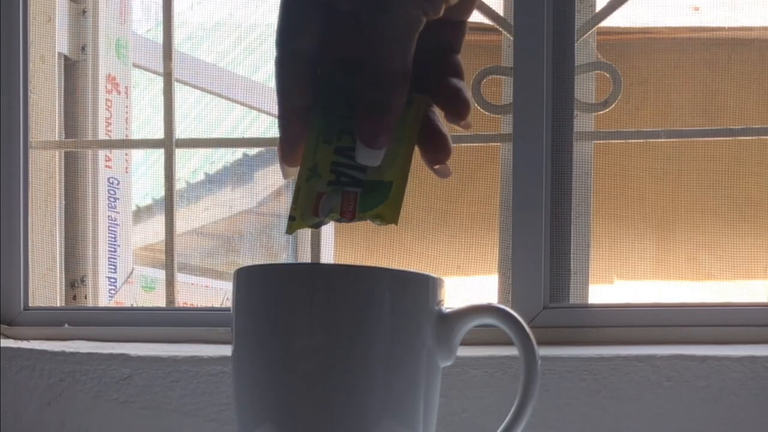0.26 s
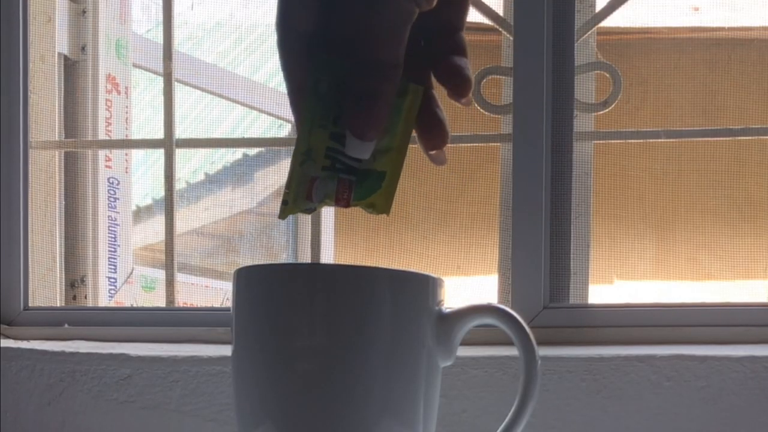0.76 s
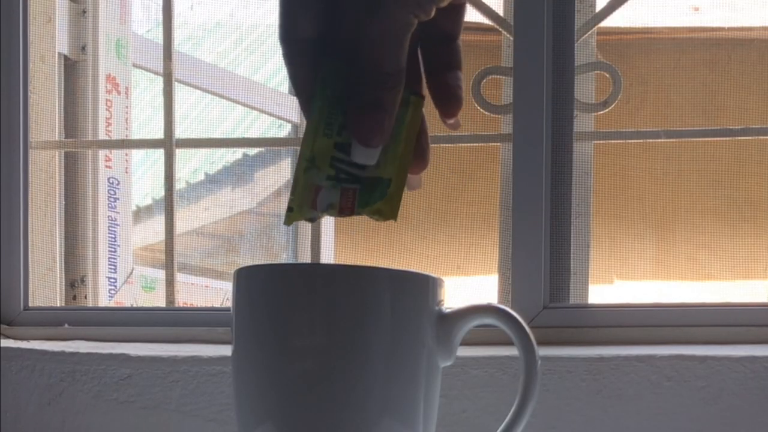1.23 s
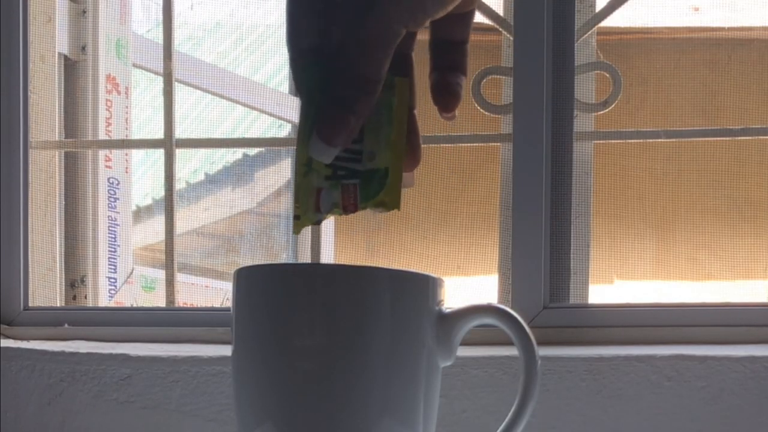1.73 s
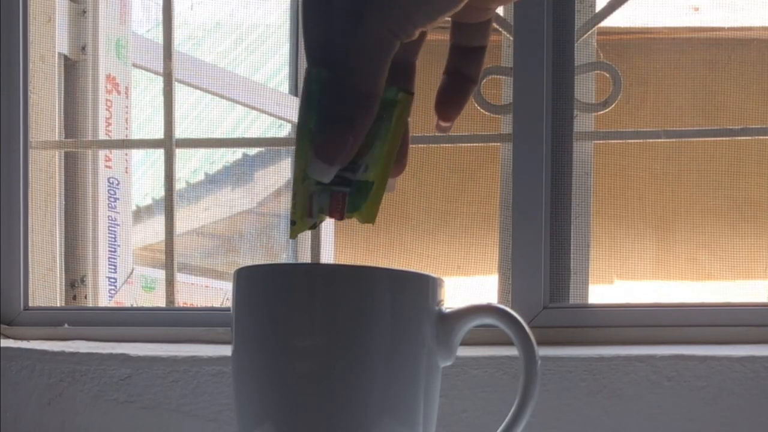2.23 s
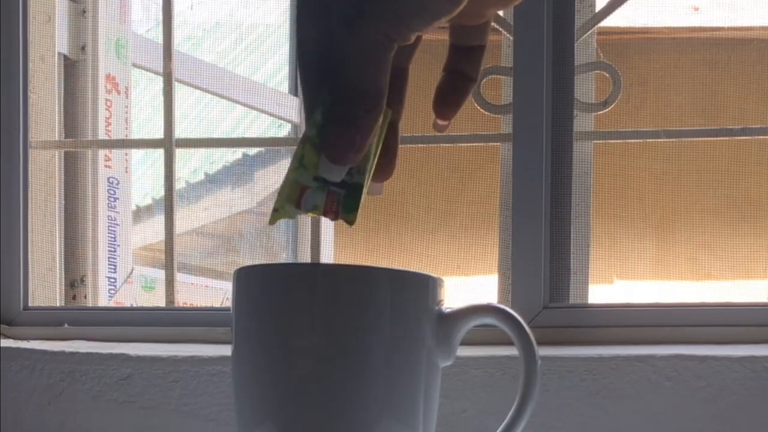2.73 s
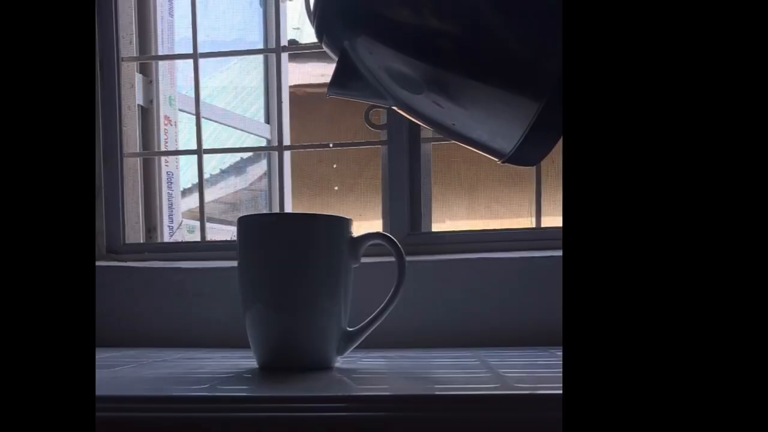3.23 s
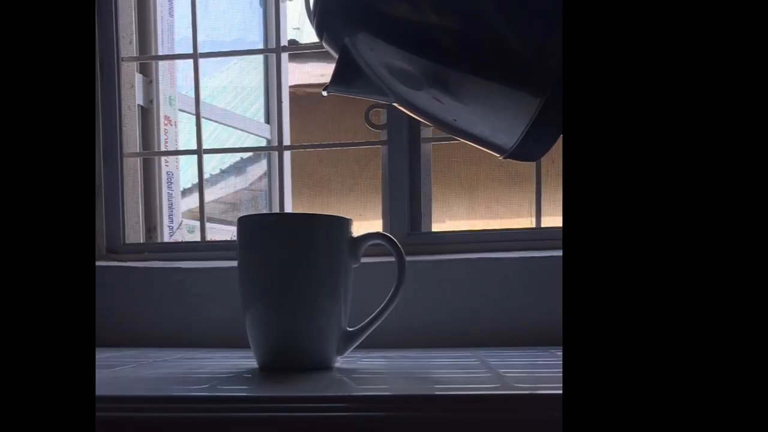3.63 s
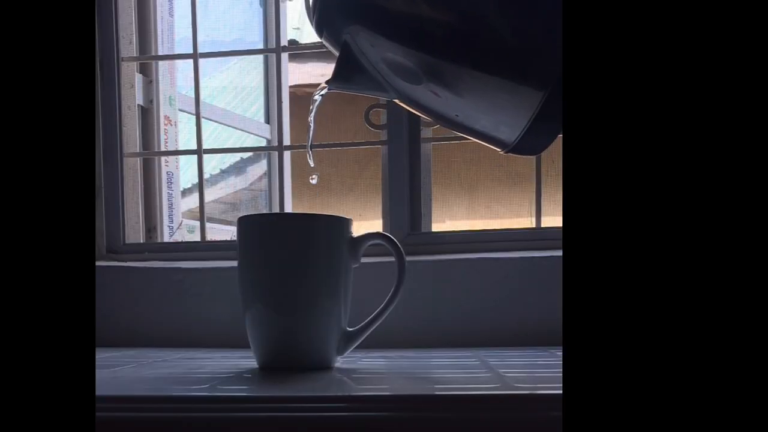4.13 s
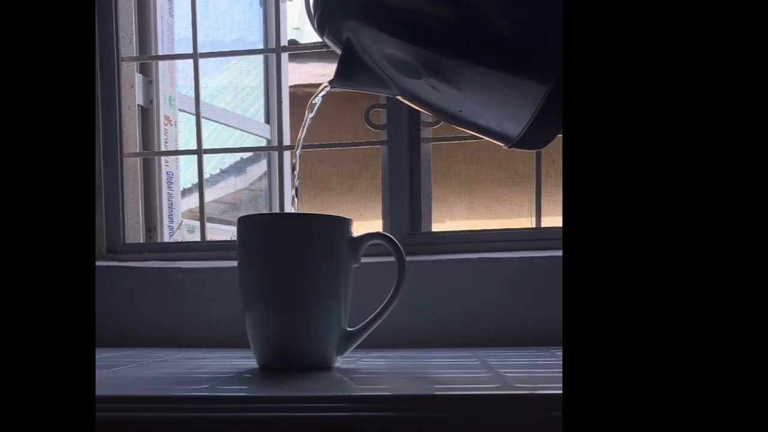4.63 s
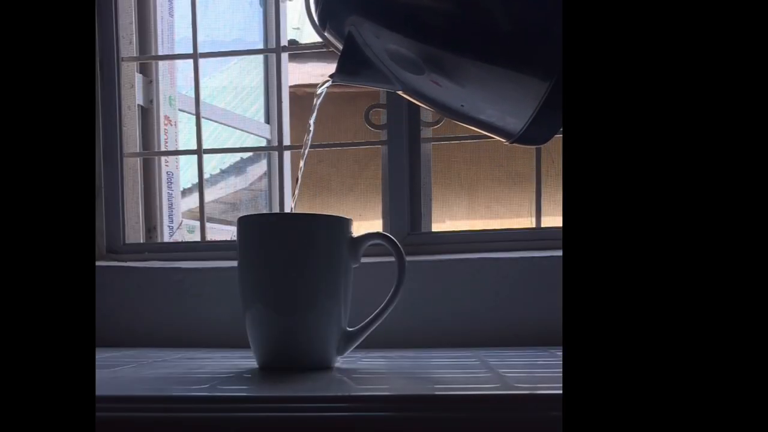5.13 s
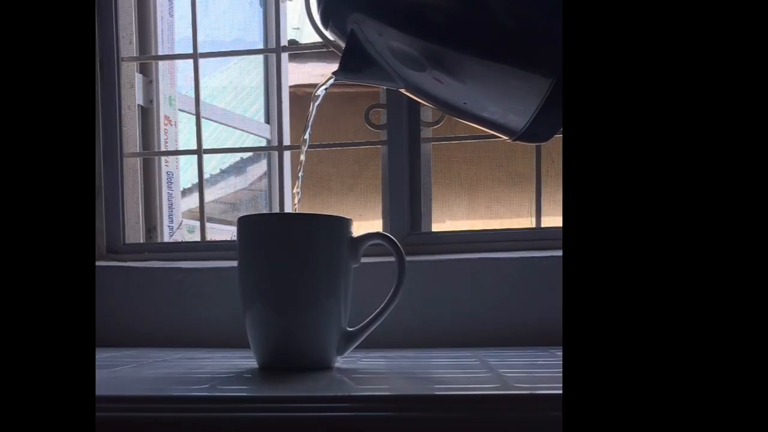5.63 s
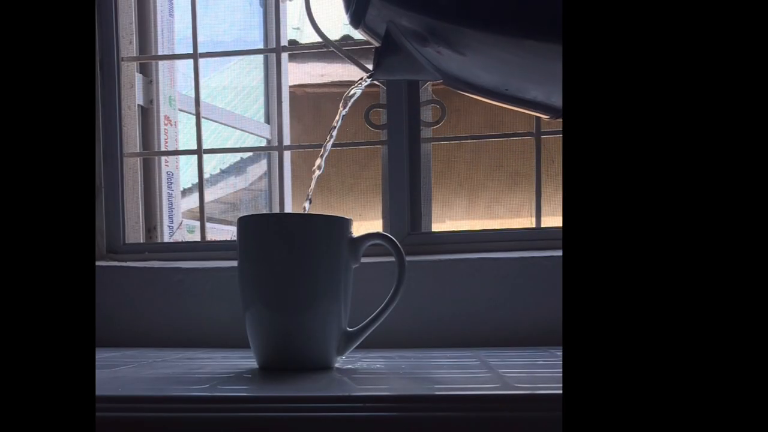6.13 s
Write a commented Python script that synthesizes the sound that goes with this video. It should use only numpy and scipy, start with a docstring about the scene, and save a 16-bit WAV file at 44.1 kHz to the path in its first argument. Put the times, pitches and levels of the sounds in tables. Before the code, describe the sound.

Crisp plastic film snaps in irregular clusters near the microphone, strongest just after two seconds, with short hard room reflections. It stops abruptly. A low, dark murmur follows, almost empty, until small water drops patter slowly into a mug with soft bubble rings. Finally slowed water pours in, low and dull, with hollow mug resonance, hissy splashing and big wobbling bubbles, ending mid-pour.

```python
"""Sachet over a mug, then slowed drops and stream

On a window sill in a small hard room, fingers squeeze and crinkle a plastic sachet over a mug: cracks and
rustle of noise, with resonant hums from the mug. After a cut come two slowed-down, deep and dull passages.
First drops from a kettle tick into the mug as noise bursts, with spatter and gliding sine bubbles.
Then a steady stream of dense noise grains and bubbles glugs and hisses in it."""
import sys
import numpy as np
from scipy import signal
from scipy.fft import rfft, irfft, next_fast_len
from scipy.io import wavfile
from scipy.ndimage import uniform_filter1d

SR = 44100
rng = np.random.default_rng(int(sys.argv[2]) if len(sys.argv) > 2 else 0)


def digitize_waveform(pressure):
    """Quantize a signal to 16-bit integers and store it at the path in sys.argv[1].

    Rows of a 2-D input are taken as channels; values are limited to [-1, 1].
    """
    field = np.atleast_2d(pressure).T
    bounded = np.clip(field, -1, 1)
    quanta = np.round(bounded * 32767).astype(np.int16)
    wavfile.write(sys.argv[1], SR, quanta)


N = 280917  # samples

CUT_S, SECOND_CUT_S = 2.8505, 5.7768
STREAM_RISE_DB_PER_S = 102


def sachet():
    """Snaps and rustle bounce off the window pane, ring the air in the mug and fill the room, over its tone."""
    # Squeezes of the sachet. Each row: start in seconds, hold in seconds, rustle in dB, powder hum in dB.
    squeezes = np.array([(0.083, 0.013, -69.5, -80), (0.175, .02, -62.5, -64.5), (0.307, 0.13, -54.5, -65),
                         (.46, 0.082, -54, -75), (0.8, .27, -60, -61.5), (1.127, .03, -51.5, -55),
                         (1.228, .08, -49, -57.5), (1.353, .07, -51, -64.5), (1.454, .02, -49.5, -56),
                         (1.563, .09, -50, -66), (1.713, .1, -57.5, -80), (1.913, .06, -36, -52),
                         (2.076, .08, -43.5, -53.5), (2.212, .07, -31.5, -48), (2.311, .07, -46, -62.5),
                         (2.438, .11, -44.5, -49.5), (2.628, .07, -34, -48.5), (2.73, .05, -35.5, -56.5),
                         (2.83, .03, -34, -50)])
    # Resonances of the air in the mug. Each row: frequency in Hz, width in Hz, relative gain in dB.
    mug_air = [(676, 110, 8), (841, 31, -2), (2450, 22, -3)]
    # Tone of the microphone capsule. Each row: frequency in Hz, relative level in dB.
    capsule = [(3000, 1), (4700, 3.5), (8500, -2.5), (12300, -1.5), (15300, 4.5), (17000, 4.5)]
    pane_echo_s, pane_echo_db = 0.00198, -18
    idle_rustle_db = -76  # between squeezes
    effort = undb(idle_rustle_db) + pushes(squeezes[:, :3], attack_s=0.006, t60=0.25)
    trickle = pushes(np.delete(squeezes, 2, axis=1), attack_s=0.02, t60=0.3)

    film = film_snaps(effort) + film_rustle(effort)
    film = film + undb(pane_echo_db) * np.roll(film, int(pane_echo_s * SR))
    wet = film + room(film, wet_db=-5.5, stretch=0.73)
    wet = np.std(wet) * colour(wet, capsule)  # same overall level, new tone
    mug = undb(-4) * resonate(wet, mug_air)
    return wet + mug + powder_hum(trickle, mug_air[:1]) + room_tone() + rumble(trickle)


def film_snaps(effort):
    """Creases of the film buckle with sharp cracks: the clearest ones listed, many small ones by chance."""
    # Clearest creases. Each row: start in seconds, approximate peak in dB before the room,
    # centre in Hz, level of the low part in dB against the centre.
    clear_snaps = [(.187, -50, 4500, -10), (.203, -47.5, 3000, 2), (.2855, -36, 5770, -13),
                   (.3177, -19, 6010, -6.5), (.3355, -22.5, 5580, -3), (.4651, -21.5, 7050, -5),
                   (.4683, -27.5, 8490, -4.5), (.522, -37, 5880, -5), (.78, -51, 4140, 2.5),
                   (.8104, -18, 5550, -13), (.8717, -17.5, 5820, -8), (.9124, -35, 4880, -15),
                   (.9253, -34, 5280, 1.5), (.9317, -28, 7636, -17), (.9508, -29, 7263, -21.5),
                   (.9546, -18.5, 6260, -27.5), (.9756, -28, 6860, -21.5), (.9843, -25, 5690, -7.5),
                   (1.0019, -29.5, 7360, -7.5), (1.0313, -27, 6090, -10), (1.0452, -27.5, 6880, -20),
                   (1.0766, -26.5, 4176, -21), (1.0941, -18, 5546, -12), (1.138, -33.5, 5060, -10),
                   (1.1568, -18.5, 5240, -17.5), (1.1721, -25.5, 5965, -18), (1.2274, -30, 7580, -14.5),
                   (1.2375, -29.5, 7920, -18.5), (1.2426, -26, 5030, -18.5), (1.2467, -18, 5880, -23),
                   (1.2589, -26, 6860, -20), (1.2643, -15, 5750, -12.5), (1.2771, -23, 8420, -11.5),
                   (1.2911, -12.5, 7060, -19), (1.36, -30.5, 5590, -3), (1.387, -21.5, 7153, -14),
                   (1.3898, -23.5, 6495, -15), (1.397, -15.5, 6230, -19.5), (1.4696, -31, 4700, -6.5),
                   (1.4726, -22, 7550, -3.5), (1.475, -27.5, 5875, -8.5), (1.4789, -23, 7565, -14),
                   (1.5415, -36.5, 9490, -24), (1.5618, -24, 5350, -15), (1.578, -23.5, 6120, -23),
                   (1.5866, -27, 7990, -16.5), (1.5898, -18, 6950, -7.5), (1.607, -21.5, 6660, -22),
                   (1.6512, -22, 7830, -16), (1.7136, -35, 5730, -9.5), (1.7268, -22, 6140, -7.5),
                   (1.7962, -16.5, 7090, -11), (1.9193, -18, 6750, -17.5), (1.922, -17.5, 5860, -18.5),
                   (1.926, -20.5, 8774, -24), (1.9307, -23, 8400, -19), (1.935, -20, 7920, -18),
                   (1.9372, -11.5, 8960, -17.5), (1.9429, -21, 6664, -9), (1.9587, -21.5, 9880, -13.5),
                   (1.9735, -19.5, 4540, -15.5), (1.9764, -21.5, 4158, -19), (1.984, -23.5, 8770, -20),
                   (2.0703, -26, 5240, -14), (2.0807, -22, 5990, -17.5), (2.0923, -24, 8170, -15.5),
                   (2.1184, -23, 6040, -10.5), (2.1205, -16, 6170, -17.5), (2.1234, -14.5, 7390, -17.5),
                   (2.1262, -20.5, 7265, -22.5), (2.142, -18, 6676, -8.5), (2.1455, -16, 6990, -15),
                   (2.211, -10.5, 8830, -18), (2.2128, -7, 8710, -12.5), (2.2166, -13, 8750, -12.5),
                   (2.2233, -7.5, 7580, -12), (2.2267, -12.5, 7000, -13), (2.2366, -8.5, 8870, -24),
                   (2.2392, -7, 7940, -23), (2.2459, -5, 8770, -18.5), (2.2515, -14, 8340, -21),
                   (2.2542, -18, 7626, -17), (2.2721, -19, 7007, -16), (2.2767, -19, 6990, -13.5),
                   (2.337, -3.5, 9985, -20.5), (2.3415, -19.5, 7720, -19.5), (2.3873, -13.5, 7813, -9),
                   (2.3893, -7.5, 8680, -27), (2.3995, -25.5, 5220, -13), (2.446, -30.5, 5343, -12),
                   (2.4766, -21, 5390, -8), (2.5011, -14.5, 5450, -22.5), (2.5191, -24.5, 5540, -21),
                   (2.5314, -19.5, 5510, -11), (2.5394, -12, 7895, -20.5), (2.5454, -19.5, 10520, -8),
                   (2.6159, -19, 8470, -12.5), (2.6337, -12, 9990, -25.5), (2.6373, -17, 9435, -27),
                   (2.6437, -15.5, 6270, -18), (2.6564, -8.5, 6220, -14), (2.6616, -20, 7520, -19.5),
                   (2.6727, -22.5, 6980, -15.5), (2.6838, -10.5, 9120, -12.5), (2.6913, -17, 5310, -17),
                   (2.7373, -19, 9760, -19), (2.757, -8.5, 8790, -21.5), (2.7607, -8.5, 7445, -22.5),
                   (2.7865, -16, 5895, -11), (2.8011, -22.5, 6450, -8.5), (2.8255, -14.5, 6970, -16),
                   (2.8296, -21.5, 6840, -18), (2.8382, -20, 7690, -15), (2.8448, -7, 7300, -21.5)]
    rows = np.vstack([clear_snaps, small_snaps(effort, count=250)])
    return clicks(rows, decay_s=0.00058, octaves=0.94, low_hz=1900, skirt_db=-20.5, size=512)


def small_snaps(effort, count):
    """Rows of many chance creases, as strong as the squeeze allows."""
    over_rustle_db = 11.5
    u = rng.random((count, 4))
    s = 0.05 + (CUT_S - 0.06) * u[:, 0]
    effort_db = 20 * np.log10(effort[(s * SR).astype(int)])
    db = effort_db + over_rustle_db + 4.0 * np.log(u[:, 1])
    hz = 4500 * 2 ** u[:, 2]
    low_db = -5 - 14 * u[:, 3]
    return np.transpose([s, db, hz, low_db])


def film_rustle(effort):
    """Dense tiny crackles of the film, following the squeezing fingers."""
    # Tone of the plastic film. Each row: frequency in Hz, relative level in dB.
    film_tone = [(300, -28.5), (1000, -19), (2500, -6.5), (4700, -0.5), (8000, -4.5), (12300, -7.5),
                 (15300, -3)]
    return effort * colour(grains(1000, scatter_db=5.5, decay_s=0.0004), film_tone)


def powder_hum(trickle, lowest_mode):
    """Powder trickling from the sachet makes the empty mug hum: grains through its lowest air resonance."""
    hum = resonate(grains(400, scatter_db=5.0, decay_s=0.00046), lowest_mode)
    return trickle * hum / np.std(hum)


def first_drops():
    """Slowed: dull room tone, then drops, spatter and small bubbles in the nearly dry mug."""
    # Drops hitting the mug. Each row: start in seconds, approximate peak in dB,
    # centre in Hz, level of the low part in dB against the centre.
    hits = [(4.7169, -59.5, 3437, 2.5), (4.8267, -50.5, 2720, -2), (4.8346, -50, 2535, -1.5),
            (4.9312, -47.5, 2580, -28), (5.0012, -54.5, 3100, -23), (5.0766, -57, 3260, -18),
            (5.1626, -52, 3360, -22), (5.1848, -49.5, 2740, -6.5), (5.2073, -38, 3250, -20),
            (5.3087, -47.5, 2900, -25), (5.3176, -58, 2760, -25), (5.3589, -52.5, 3232, -11),
            (5.4892, -61, 4050, -19), (5.5086, -52, 3720, -17), (5.5837, -56.5, 3700, -15),
            (5.6185, -57, 3440, -18), (5.6388, -50, 2850, -7), (5.6546, -50, 3740, -11),
            (5.3725, -53, 3080, -1), (5.7732, -31, 3840, -18)]
    # Short clear rings. Each row: start in seconds, peak in dB, pitch in Hz, 60 dB decay time in seconds.
    ring_rows = [(3.53, -63, 340, .53), (3.54, -60.5, 406, .32), (4.81, -60, 830, .053),
                 (5.2, -59, 1350, .036), (5.25, -61.5, 1444, 0.052), (5.395, -56.5, 1230, 0.018),
                 (5.49, -60.5, 4220, .13), (5.58, -70, 1085, .1), (5.575, -66, 2700, .08),
                 (5.6, -60.5, 690, 0.33), (5.646, -54.5, 1530, 0.023), (5.71, -56.5, 1380, .04),
                 (5.714, -57, 1140, .07), (5.72, -61, 2700, 0.087)]
    # Spatter of the first thin stream. Each row: time in seconds, level in dB.
    spatter_level = [(4.7, -92), (4.715, -68), (4.8, -62), (4.95, -64), (5.15, -67), (5.6, -61),
                     (5.66, -52), (5.77, -56)]
    # Tone of the spatter. Each row: frequency in Hz, relative level in dB.
    spatter_tone = [(300, -22), (700, -7), (1800, 4.5), (3400, 2), (4600, 8)]
    drops = clicks(hits, decay_s=0.0013, octaves=0.49, low_hz=1047.6, skirt_db=-17.5, size=1024)
    spatter = curve(spatter_level) * colour(grains(500, scatter_db=-0.5, decay_s=0.00059), spatter_tone)
    small_rows = fizz(4.72, 5.76, count=220, lo_hz=600, hi_hz=3600, db=-65, cycles=22)
    small = bubbles(small_rows, rise_s=0.003)
    rings = bubbles(with_glide(ring_rows, -0.011), rise_s=0.0066)
    rings = rings * (1 + 0.2 * walk(350))  # the rings flutter
    return drops + room(drops, wet_db=-4.5, stretch=1.9) + spatter + small + rings + slow_tone()


def stream():
    """Slowed: the stream drums in the mug, whose air column rings, and drags bubbles of all sizes under."""
    # Surges of the stream. Each row: start in seconds, hold in seconds, gain in dB ahead of the water gain.
    surges = [(6.0, 0.014, -55.5), (6.2, 0.013, -47), (6.33, 0.045, -61)]
    # Heavier slaps within the stream. Each row: start in seconds, approximate peak in dB,
    # centre in Hz, level of the low part in dB against the centre.
    slap_rows = [(5.8825, -64, 3020, -12), (5.928, -61, 3560, -6), (5.9999, -53.5, 4200, 5),
                 (6.0544, -55, 2230, -4), (6.099, -56, 2060, 6), (6.2078, -50, 3220, -6),
                 (6.2593, -57, 3520, 0), (6.2941, -55, 2800, 6), (6.325, -58, 2790, 10)]
    lands_s, before_landing_db = 5.874, -10
    stream_db, water_db = -55, 4.0  # stream_db sets the flow alone; water_db lifts it along with the surges
    full_s = 5.99
    landed = np.arange(N) > lands_s * SR

    rise = fade_in(full_s, STREAM_RISE_DB_PER_S) * np.where(landed, 1, undb(before_landing_db))
    flow = rise * undb(stream_db) + pushes(surges, attack_s=0.019, t60=0.07)
    # bubble levels are relative to the flow
    middle_rows = fizz(5.82, 6.37, count=130, lo_hz=293, hi_hz=1180, db=-2, cycles=15)
    small_rows = fizz(5.87, 6.37, count=90, lo_hz=1710, hi_hz=4530, db=-5.5, cycles=75)
    middle = bubbles(middle_rows, rise_s=0.0055)
    small = bubbles(small_rows, rise_s=0.0049)
    water = flow * (undb(water_db) * splash() + middle + small)
    slaps = clicks(slap_rows, decay_s=0.004, octaves=0.39, low_hz=900, skirt_db=-16, size=2048)
    return water + landed * warble() + slaps + glugs()


def splash():
    """Dense bursts of noise where the stream strikes, ringing the air column of the filling mug."""
    # Tone of the stream. Each row: frequency in Hz, relative level in dB.
    stream_tone = [(60, 9), (130, 14.5), (240, 18), (340, 2.5), (680, -7.5), (1200, -11), (3200, -10),
                   (4500, -16)]
    # Resonances of the filling mug. Each row: frequency in Hz, width in Hz, relative gain in dB.
    filling_mug = [(535, 26, 4), (668, 48, 15.5), (2700, 56, -0.5), (3380, 89, -2), (4102.2, 200, 0)]
    strikes = colour(grains(1500, scatter_db=2.0, decay_s=0.0048), stream_tone)
    return strikes + resonate(strikes, filling_mug)


def glugs():
    """Big bubbles under the stream; the surface heaves, so they are shaken as they ring."""
    # Big bubbles. Each row: start in seconds, peak in dB before the shaking,
    # pitch in Hz, 60 dB decay time in seconds.
    big_bubbles = [(5.828, -64, 225, .19), (5.884, -49.5, 227.6, .5), (5.929, -47, 135, .13),
                   (5.943, -51.5, 138, .19), (6.006, -46, 253, .11), (6.029, -45, 149, .12),
                   (6.06, -42, 209, 0.16), (6.099, -44, 214, 0.065), (6.105, -39.5, 123, 0.25),
                   (6.149, -49.5, 138, .16), (6.195, -41.5, 231.5, 0.24), (6.208, -45.5, 250, .1),
                   (6.24, -41, 234, 0.11), (6.276, -55, 163, 0.26), (6.323, -38.5, 253, 0.12),
                   (6.347, -35.5, 249, 0.29)]
    return bubbles(with_glide(big_bubbles, 0.11), rise_s=0.005) * (1 + 0.27 * walk(90))


def warble():
    """A pocket of air under the stream: a rough noisy band whose pitch wobbles, fading as the mug fills."""
    centre_hz, level_db = 1457, -58.5
    full_s, hold_s, sag_db_per_s = 5.935, 0.2, 60
    sag_db = -sag_db_per_s * np.maximum(np.arange(N) / SR - full_s - hold_s, 0)
    hz = centre_hz * (1 + 0.05 * walk(80))
    rough_band = walk(420) * np.sin(2 * np.pi * np.cumsum(hz) / SR)
    return fade_in(full_s, STREAM_RISE_DB_PER_S) * undb(level_db + sag_db) * rough_band


def fizz(t0, t1, count, lo_hz, hi_hz, db, cycles):
    """Rows of many small random bubbles for bubbles(); most glide up, some down."""
    u = rng.random((count, 4))
    s = t0 + (t1 - t0) * u[:, 0]
    hz = lo_hz * (hi_hz / lo_hz) ** u[:, 1]
    glide = 0.37 * (u[:, 3] - 0.4)
    return np.transpose([s, db - 12 * u[:, 2], hz, cycles / hz, glide])


def bubbles(table, rise_s):
    """Damped sines whose pitch glides as the bubble moves against the surface."""
    out, t = np.zeros(2 * N), np.arange(SR // 4) / SR
    for s, db, hz, t60, glide in table:
        shape = (1 - np.exp(-(t / rise_s) ** 2)) * np.exp(-np.log(1000) * t / t60)
        tone = np.sin(2 * np.pi * hz * (t + glide * t ** 2 / t60))
        start = int(s * SR)
        out[start:start + len(t)] += undb(db) * shape / shape.max() * tone
    return out[:N]


def with_glide(table, glide):
    """The same pitch glide for every row, as a share of the pitch reached after half the decay time."""
    return [(*row, glide) for row in table]


def clicks(table, decay_s, octaves, low_hz, skirt_db, size):
    """Each row a sharp crack with a noisy decay, coloured round its own centre, plus a longer low thud."""
    s, db, hz, low_db = (c[:, None] for c in np.transpose(table))
    lead = size // 8  # samples of silence before the onset
    t = np.maximum(np.arange(size) - lead, 0) / SR
    f = np.arange(size // 2 + 1) * SR / size + 1
    chance = rng.standard_normal((len(table), 2 * size)) * np.tile(np.arange(size) >= lead, 2)
    # crack and thud both open with a firm push of the same sign
    chance[:, [lead, size + lead]] = 1.38 * np.sign(chance[:, [lead]])

    def burst(noise, tau, shape):
        """Decaying noise, filtered to a spectrum and scaled to unit energy."""
        y = irfft(rfft(noise * np.exp(-t / tau)) * shape)
        return y / np.sqrt(np.sum(y ** 2, axis=1, keepdims=True))

    crack_shape = np.exp(-(np.log2(f / hz) / octaves) ** 2) + undb(skirt_db) * (f > hz)
    thud_shape = np.exp(-(np.log2(f / low_hz) / 1.33) ** 2)
    crack = burst(chance[:, :size], decay_s, crack_shape)
    thud = burst(chance[:, size:], 3.0 * decay_s, thud_shape)
    energy_to_peak = 0.76 * np.sqrt(decay_s * SR)
    bursts = (crack + undb(low_db) * thud) * undb(db) * energy_to_peak
    starts = ((s[:, 0] - 0.5 * decay_s) * SR).astype(int) - lead
    out = np.zeros(N + size)
    for start, row in zip(starts, bursts):
        out[start:start + size] += row
    return out[:N]


def grains(rate, scatter_db, decay_s):
    """Dense random clicks of uneven size, each a tiny decaying burst of noise; rate is per second."""
    sizes = (rng.random(N) < rate / SR) * undb(scatter_db * rng.standard_normal(N))
    envelope = signal.lfilter([1], [1, -np.exp(-1 / (decay_s * SR))], sizes)
    return envelope * rng.standard_normal(N)


def resonate(x, modes):
    """Sum of resonances, each a peak filter with its own centre, width and gain."""
    return sum(undb(db) * signal.lfilter(*signal.iirpeak(hz, hz / width, fs=SR), x) for hz, width, db in modes)


def room(x, wet_db, stretch):
    """Diffuse tail: one noise split into octave bands that die at their own rates."""
    # Decay of the small hard room before stretching. Each row: frequency in Hz, 60 dB decay time in seconds.
    decay_times = [(500, .35), (2000, 0.47), (5500, .25), (9000, 0.23), (14000, 0.1)]
    # Tone of the tail before stretching. Each row: frequency in Hz, relative level in dB.
    tail_tone = [(200, 7.5), (1000, 0), (4500, -5), (9000, 1.5), (16000, -3)]
    t = np.arange(int(0.37 * stretch * SR)) / SR
    hz, t60 = np.transpose(decay_times)
    stretched_tone = [(f / stretch, db) for f, db in tail_tone]
    noise = rfft(colour(rng.standard_normal(len(t)), stretched_tone))
    octave = np.log2(np.arange(len(noise)) * SR / len(t) * stretch / 250 + 1e-9)  # above 250 Hz
    tail = 0
    for k in range(7):
        band = irfft(noise * np.clip(1 - np.abs(octave - k), 0, 1), len(t))
        band_t60 = stretch * np.interp(np.log(250 * 2 ** k), np.log(hz), t60)
        tail = tail + band * np.exp(-np.log(1000) * t / band_t60)
    onset = np.clip(t / (0.0017 * stretch), 0, 1)
    near_surfaces = 1 + 1.8 * np.exp(-t / (0.0042 * stretch))  # these answer first
    tail = tail * onset * near_surfaces
    return undb(wet_db) * signal.fftconvolve(x, tail / np.sqrt(np.sum(tail ** 2)))[:N]


def room_tone():
    """Steady tone of the room: coloured noise of slightly wavering level."""
    # Spectrum of the room tone. Each row: frequency in Hz, relative density in dB per Hz.
    tone_points = [(240, -28.5), (400, -3.5), (986, -4.5), (1430, -8.5), (1620, -10), (3170, -8.5),
                   (15300, -8.5), (16500, -11.5)]
    return undb(-61 + 1.1 * walk(23)) * colour(rng.standard_normal(N), tone_points)


def rumble(trickle):
    """Low noise: a steady murmur of the house, plus the moving hand in step with the powder."""
    # Spectrum of the rumble. Each row: frequency in Hz, relative density in dB per Hz.
    rumble_points = [(15, -45), (25, -8.5), (60, -6), (114, -5), (194, -1), (300, -1), (400, -10.5),
                     (600, -12.5), (900, -40)]
    house_db, hand_db = -65, -11.5  # hand: against the powder hum
    level = undb(house_db) + undb(hand_db) * trickle
    return level * colour(rng.standard_normal(N), rumble_points)


def slow_tone():
    """The slowed room tone: deep coloured noise that fades in after the cut, drifts and wavers."""
    # Slow drift. Each row: time in seconds, level in dB against the usual level.
    drift = [(2.85, 5.5), (3.2, 2.5), (4.2, -1.5), (4.65, -2), (4.8, 0.5), (5.8, -1.5)]
    # Spectrum of the slowed tone. Each row: frequency in Hz, relative density in dB per Hz.
    slow_points = [(15, -36), (25, -0.5), (57, 3), (96, -9), (173, -2), (234, -10.5), (378, -11.5),
                   (403, -8.5), (470, -16), (791, -18), (921, -22.5), (4500, -28), (5850, -58),
                   (9900, -120)]
    level = curve(drift) * fade_in(full_s=3.056, db_per_s=184.5) * undb(-66.5 + walk(42))
    return level * colour(rng.standard_normal(N), slow_points)


def undb(db):
    """Decibels to amplitude ratio."""
    return 10 ** (np.asarray(db) / 20)


def curve(table):
    """Gain over time from rows of seconds and dB, silent outside them."""
    s, db = np.transpose(table)
    return undb(np.interp(np.arange(N) / SR, s, db, left=-200, right=-200))


def pushes(table, attack_s, t60):
    """Gain over time of (start s, hold s, dB) rows: each rises, holds and dies away."""
    out, t = 0, np.arange(N) / SR
    for s, hold, db in table:
        attack = np.clip((t - s) / attack_s, 0, 1)
        out = out + undb(db - 60 / t60 * np.maximum(t - s - hold, 0)) * attack
    return out


def fade_in(full_s, db_per_s):
    """Gain that climbs evenly in dB up to full level."""
    return undb(db_per_s * np.minimum(np.arange(N) / SR - full_s, 0))


def walk(rate):
    """Random levels held 1 / rate seconds and smoothed twice into slopes; spread 1."""
    k = int(SR / rate)
    held = np.repeat(rng.standard_normal(N // k + 1), k)
    y = uniform_filter1d(uniform_filter1d(held, k), k)[:N]
    return y / np.std(y)


def colour(x, points):
    """Shape the spectrum by (Hz, dB) points, joined along log frequency; rms 1."""
    size = next_fast_len(len(x))
    hz, db = np.transpose(points)
    f = np.arange(size // 2 + 1) * SR / size + 1
    gain = undb(np.interp(np.log(f), np.log(hz), db))
    y = irfft(rfft(x, size) * gain, size)
    return y[:len(x)] / np.std(y)


def scene():
    """Three passages joined by hard cuts; slowing down lowers the top of the last two."""
    t = np.arange(N) / SR
    dull = signal.ellip(12, 0.3, 60, 4640, fs=SR, output="sos")  # top in Hz
    pour_on = t > SECOND_CUT_S + 0.042
    drops, pour = signal.sosfilt(dull, [first_drops(), stream() * pour_on])
    sachet_on = np.clip((CUT_S - t) / 0.001, 0, 1)
    drops_on = np.clip((SECOND_CUT_S - t) / 0.001, 0, 1)
    return (sachet() * sachet_on + drops * drops_on + pour)[None]


def record(dry):
    """The loudest cracks are rounded, the top rolls off, and coarse sample steps leave a faint hiss."""
    mic_top_hz, top_hz = 15850, 17130
    wet = 0.85 * np.tanh(dry / 0.85)
    wet = signal.sosfilt(signal.ellip(8, 0.3, 22, mic_top_hz, fs=SR, output="sos"), wet)
    step = undb(-81.5)
    stepped = step * np.round(wet / step)
    return signal.sosfilt(signal.ellip(10, 0.2, 70, top_hz, fs=SR, output="sos"), stepped)


dry = scene()
out = record(dry)
digitize_waveform(out)
```